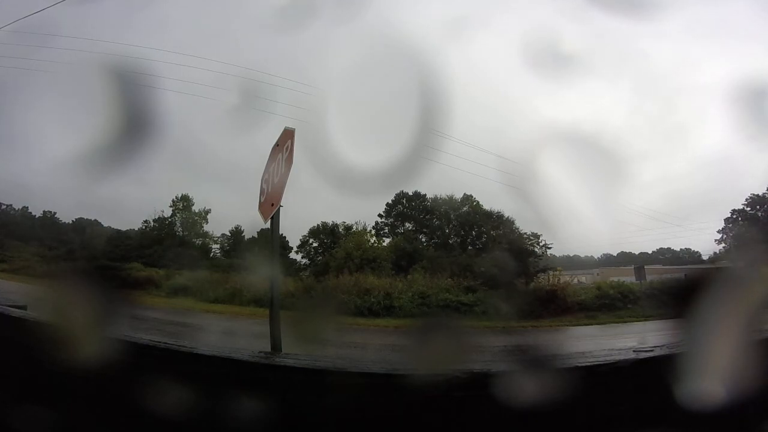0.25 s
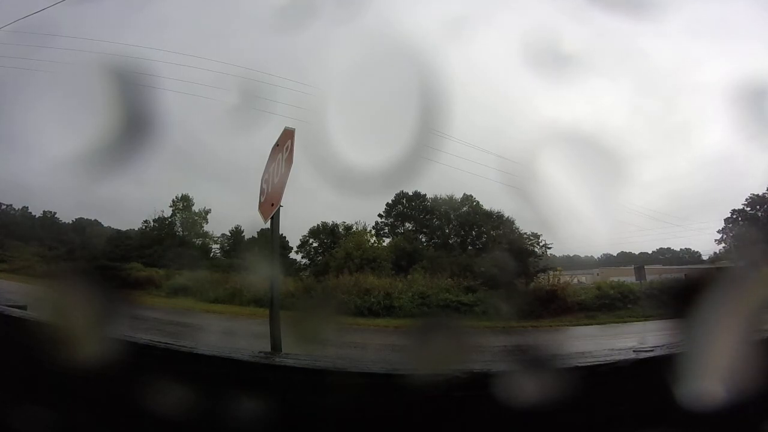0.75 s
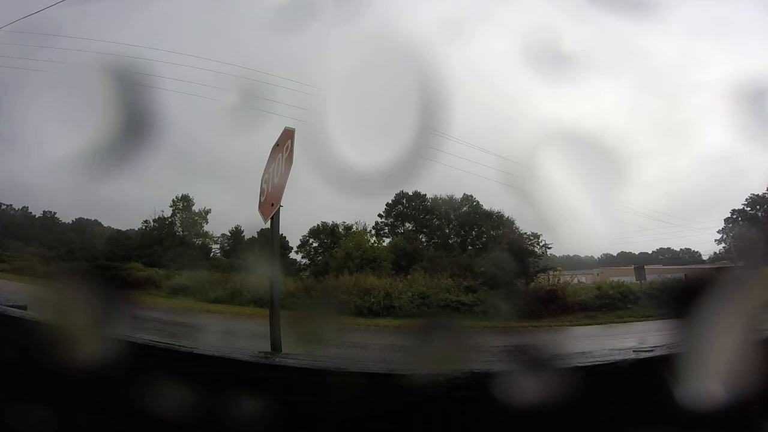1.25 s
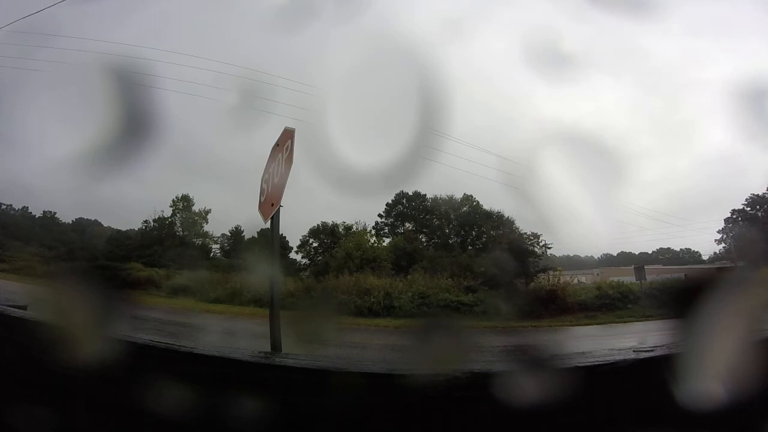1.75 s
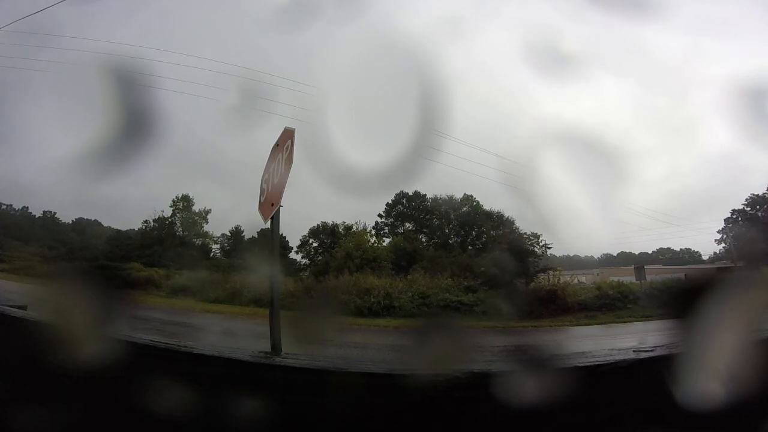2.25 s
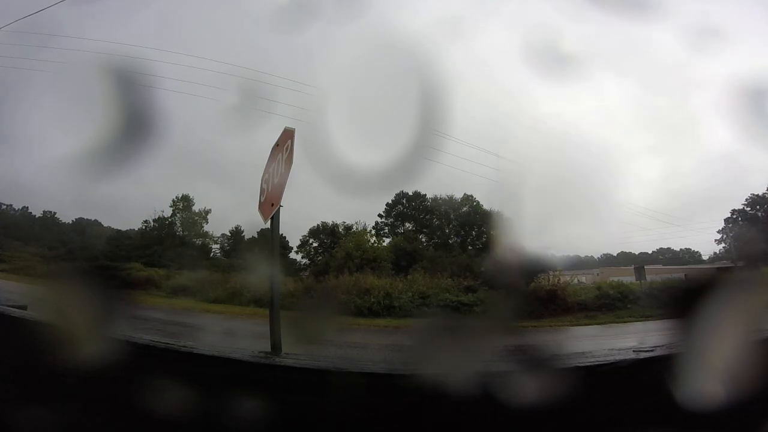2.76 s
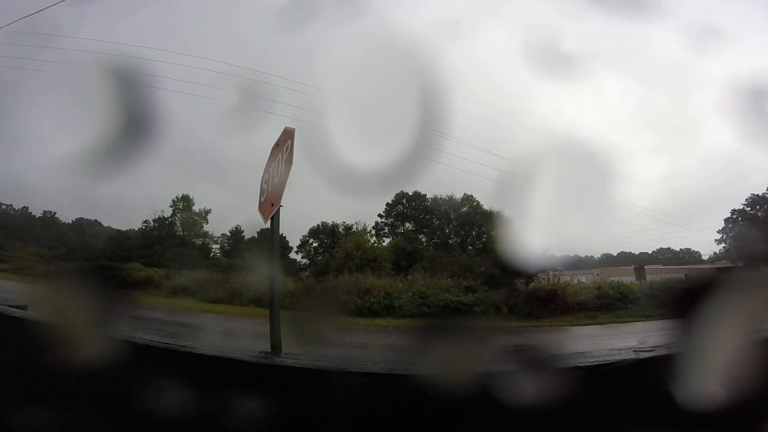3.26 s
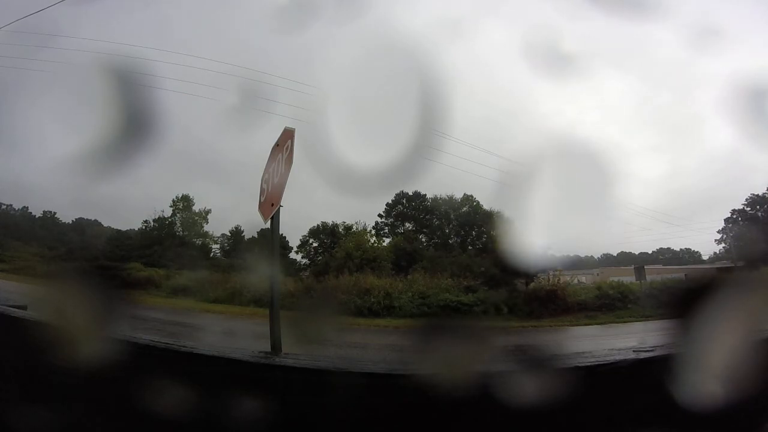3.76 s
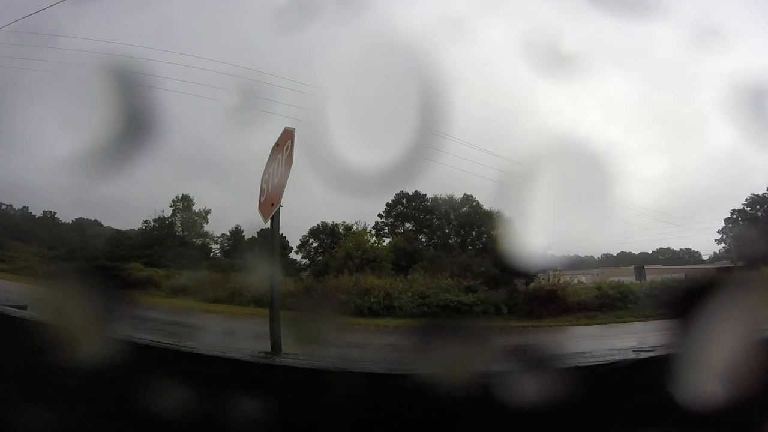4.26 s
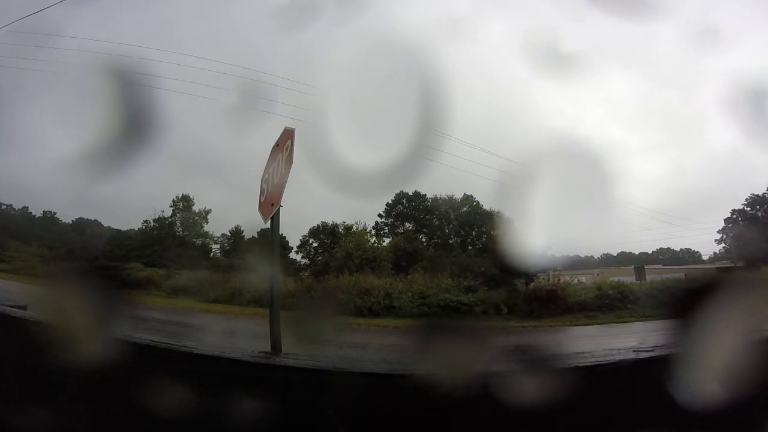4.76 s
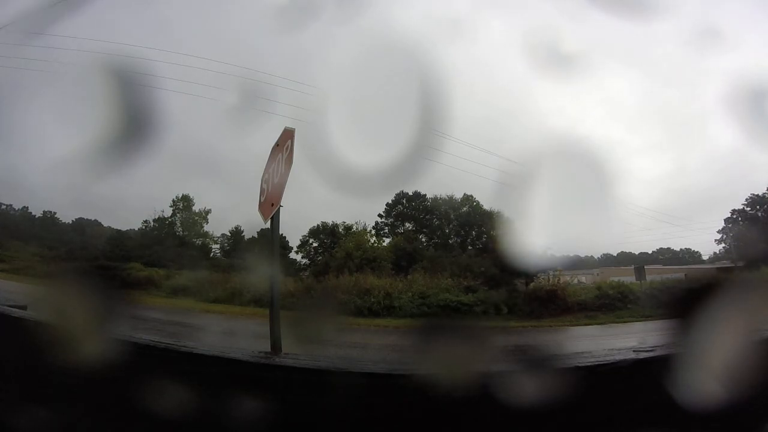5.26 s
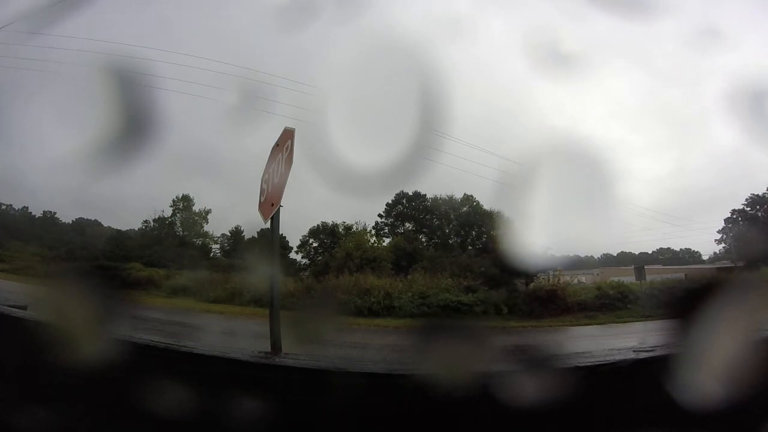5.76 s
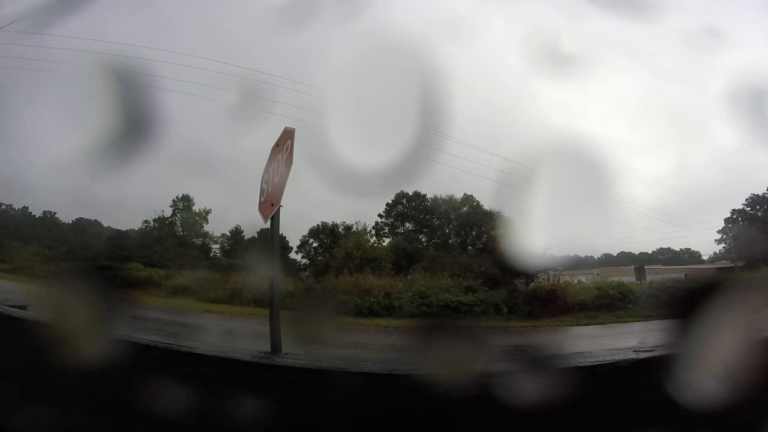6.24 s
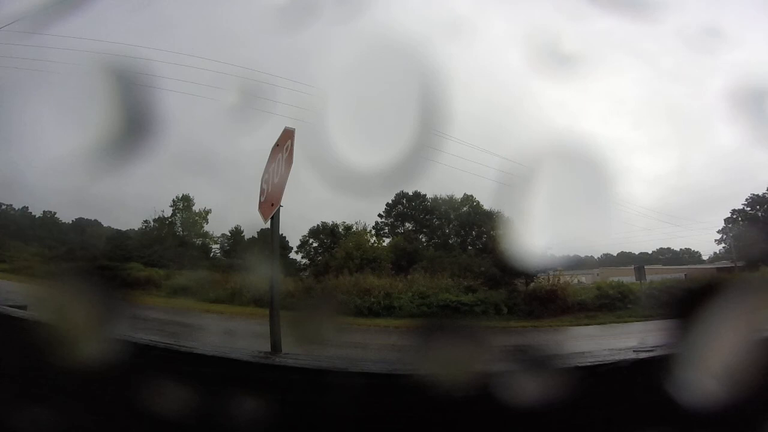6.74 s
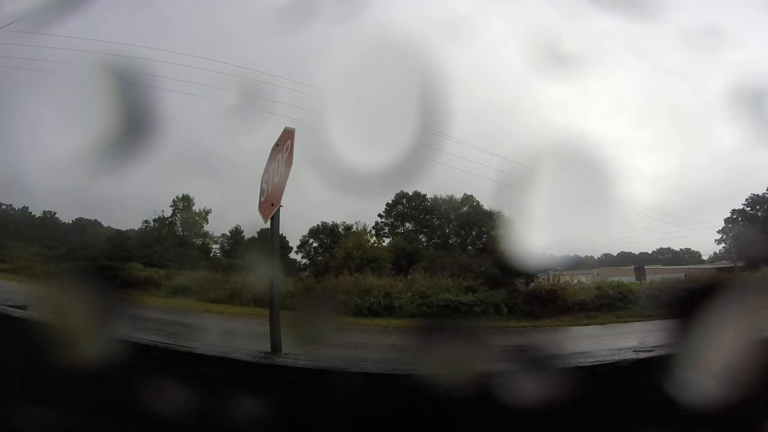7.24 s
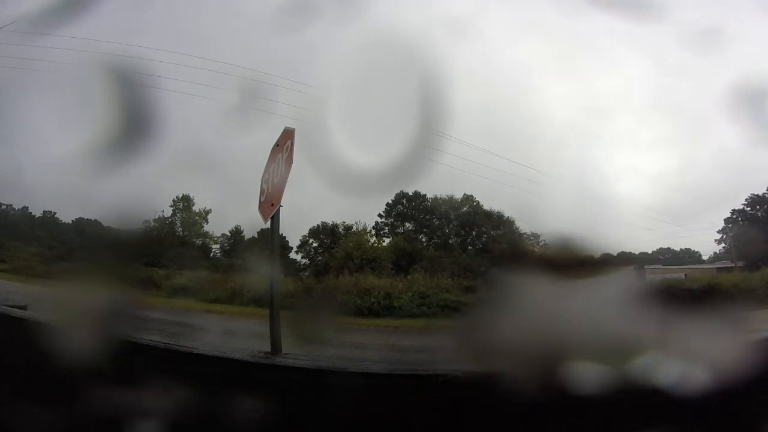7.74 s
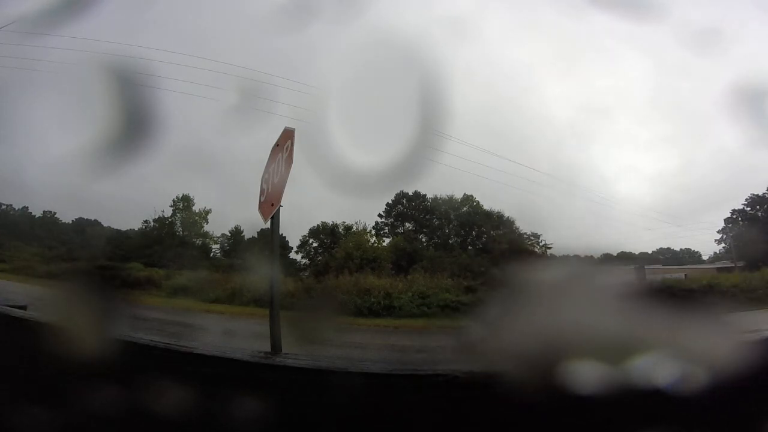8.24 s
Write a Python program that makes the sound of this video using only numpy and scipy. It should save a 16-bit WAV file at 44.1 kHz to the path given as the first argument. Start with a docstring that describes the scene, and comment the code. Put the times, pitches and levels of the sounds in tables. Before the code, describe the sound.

Very close mono sound of rain hitting a plastic shell: crisp clicks, duller knocks and tiny droplets at random intervals, each dying almost at once. A few hard drops jump well above the rest, and occasional heavy drips give soft low thuds. Distant rain over open fields stays as a quiet, slightly flickering hiss with soft low rumble underneath, dry and without reverberation.

```python
"""A faint hiss of rain on the fields and a low rumble of open air lie behind close taps of rain on plastic.
The rain falls on a small plastic camera case outdoors: each drop splats on the shell and rings its damped modes,
coloured by where it lands and how sharply it strikes. Light drops and fine droplets patter in between.
A few drops ring the mount or thud softly; the distance is noise in flickering octaves, all in one channel."""
import sys
import numpy as np
from scipy import signal
from scipy.fft import rfft, irfft
from scipy.io import wavfile
from scipy.ndimage import uniform_filter1d

SR = 44100
rng = np.random.default_rng(int(sys.argv[2]) if len(sys.argv) > 2 else 0)


def wrap_up_sound(samples):
    """Save the sound to the file named by the first command line argument, as 16-bit audio."""
    columns = np.atleast_2d(samples).T
    # keep every value between -1 and 1, then stretch to whole-number steps
    tamed = np.clip(columns, -1, 1)
    steps = np.round(tamed * 32767).astype(np.int16)
    wavfile.write(sys.argv[1], SR, steps)


N = 374832

# Edges of the four bands that set a drop's colour: f/Hz
BAND_EDGES_HZ = [900, 1800, 2900, 5200, 14000]
TAP_SIZE = 1024  # samples in one drop


def undb(db):
    """Decibels to amplitude gain."""
    return 10 ** (np.asarray(db) / 20)


def add(out, s, sound):
    """Mix a sound in at time s (seconds)."""
    i = int(np.clip(s * SR, 0, N - 1))
    out[i:i + len(sound)] += sound[:N - i]


def log_curve(hz, points_hz, db):
    """Straight lines in dB on a log-frequency axis."""
    return np.interp(np.log(np.maximum(hz, 1)), np.log(points_hz), db)


def walk(rate_hz):
    """Random levels, each held for 1 / rate_hz seconds, then smoothed twice over that time."""
    hold = int(SR / rate_hz)
    levels = np.repeat(rng.standard_normal(N // hold + 1), hold)
    return uniform_filter1d(uniform_filter1d(levels, hold), hold)[:N]


def field(level_db=-54, flicker_db=1.83):
    """Distant rain and air: shaped noise, steady overall, each octave band flickering on its own."""
    # Spectrum of rain on the fields and open air, relative: f/Hz, level/(dB per Hz)
    air_curve = [(15, -47.5), (25, 2), (64, 2), (128, 2), (231, -1), (543, -8.5), (1090, -12), (1240, -15),
                 (1420, -12), (1630, -11.5), (2020, -17), (2430, -15.5), (3730, -22.5), (9270, -30.5),
                 (15000, -44.5)]
    hz = np.fft.rfftfreq(N, 1 / SR)
    spectrum = rfft(rng.standard_normal(N)) * undb(log_curve(hz, *np.transpose(air_curve)))
    octave = np.log2(np.maximum(hz, 40)).astype(int)
    out = np.zeros(N)
    for k in np.unique(octave):
        flicker = undb(flicker_db * walk(20))
        out += irfft(spectrum * (octave == k), N) * flicker
    return out * undb(level_db) / np.std(out)


def ring(modes, weights, size):
    """Free ringing: a sum of exponentially damped cosines, each struck with its own weight."""
    hz, t60, db = np.transpose(modes)
    t = np.arange(size)[:, None] / SR
    decay = np.exp(-np.log(1000) * t / t60)
    return (decay * np.cos(2 * np.pi * hz * t)) @ (undb(db) * weights)


def causal(db):
    """Minimum-phase frequency response with these gains, which never sounds ahead of its input."""
    cepstrum = irfft(np.log(undb(db)))
    half = len(cepstrum) // 2
    # fold the part ahead of time zero onto the part after it
    cepstrum[1:half] *= 2
    cepstrum[half + 1:] = 0
    return np.exp(rfft(cepstrum))


def strike(spot_hz, spot_db=7, spot_octaves=0.16, splat_s=0.0002, splat=0.2,
           spray_s=0.0024, spray_db=-15, spray_low_hz=450):
    """A push and a brief splat ring the case, most of all the modes that are lively where the drop lands."""
    # Modes of the plastic shell: f/Hz, t60/s, level/dB
    case_modes = [(215, 0.041, -19.5), (970, 0.0076, -22), (1404, 0.0061, -20.5), (1454, 0.014, -8.5),
                  (1836, 0.016, -8), (2125, 0.016, -1.5), (2400, 0.02, -0.5), (2697, 0.012, 0),
                  (3198, 0.014, -4), (3567, 0.017, -11), (3980, 0.018, -12.5), (4740, 0.0072, -16),
                  (6290, 0.0069, -15), (7330, 0.0053, -17), (8560, 0.0027, -12.5), (10300, 0.0011, -20.5)]
    t = np.arange(TAP_SIZE) / SR
    force = splat * rng.standard_normal(TAP_SIZE) * np.exp(-t / splat_s)
    force[0] += 2
    modes = np.array(case_modes)
    modes[:, 2] += spot_db * np.exp(-(np.log2(modes[:, 0] / spot_hz) / spot_octaves) ** 2)
    # clinging water loads the shell: its modes shift a little and answer unevenly
    modes[:, 0] *= 1 + .012 * rng.standard_normal(len(modes))
    signs = (-1) ** np.arange(len(modes))
    weights = signs * (1 + .45 * rng.standard_normal(len(modes)))
    # the drop bursts into a short hiss of spray, thinned in the bass
    spray = undb(spray_db) * rng.standard_normal(TAP_SIZE) * np.exp(-t / spray_s)
    spray = signal.lfilter([1, -1], [1, -np.exp(-2 * np.pi * spray_low_hz / SR)], spray)
    ringing = signal.fftconvolve(force, ring(modes, weights, TAP_SIZE))[:TAP_SIZE]
    return ringing + spray


def tap(spot_hz, band_db, bass_db=-6, top_db=-15.5):
    """A strike brought near one drop's band levels; the shell muffles the very top."""
    hz, edges = np.fft.rfftfreq(TAP_SIZE, 1 / SR), np.array(BAND_EDGES_HZ)
    muffle_db = log_curve(hz, [400, 900, 8200, 12500], [bass_db, 0, 0, top_db])
    spectrum = rfft(strike(spot_hz)) * causal(muffle_db)
    bands = (hz >= edges[:-1, None]) & (hz < edges[1:, None])
    centres_hz = np.r_[650, np.sqrt(edges[:-1] * edges[1:])]
    for _ in range(2):
        # the tap's energy counted as power over 10 ms
        power = bands @ np.abs(spectrum) ** 2 * 2 / TAP_SIZE / (.01 * SR)
        gain_db = band_db - 10 * np.log10(power)
        # the bass gets no more gain than the bands on average
        bass_gain_db = min(gain_db.mean(), gain_db[0])
        spectrum = spectrum * causal(log_curve(hz, centres_hz, np.r_[bass_gain_db, gain_db]))
    return irfft(spectrum)


def drop_colour(spot_hz, db, sharp_db, splash_db, spot_lift_db=6, spot_width_octaves=0.45):
    """Band levels, low to high: sharp blows are bright, soft ones knock, the spot stands out; splash on top."""
    # Colour shared by drops in the low, middle and high bands: level/dB
    shared_colour = [-2.5, 0, -2.5]
    # Change of those three bands with sharpness: slope/(dB per dB)
    sharp_slope = [-0.8, 0, 0.76]
    edges = np.array(BAND_EDGES_HZ[:-1])
    octaves = np.log2(np.sqrt(edges[:-1] * edges[1:]) / spot_hz)
    spot_lift = spot_lift_db * np.exp(-(octaves / spot_width_octaves) ** 2)
    colour = shared_colour + sharp_db * np.array(sharp_slope) + spot_lift
    # the three bands together carry the tap's power
    colour = colour - 10 * np.log10(np.sum(undb(colour) ** 2))
    return db + np.r_[colour, splash_db]


def drops(gain_db=0.92, fragment_db=-22, fragment_s=0.008):
    """Distinct drops close by on the case; each breaks up and a fragment lands 4 to 8 ms later."""
    # Drops: t/s, liveliest pitch of the landing spot f/Hz, level before gain_db (power over 10 ms)/dB,
    # sharpness of the blow/dB, splash relative to the tap/dB
    taps = [(0.021, 1680, -42, 0, -15), (0.1184, 2500, -45.0, -8, -29), (0.137, 1300, -35, 0.5, -13),
            (0.1551, 1500, -42, 1, -30), (0.3092, 1470, -38.5, -4, -21), (0.5135, 2320, -30.5, 2.5, -16),
            (0.5519, 3100, -40, 8.0, -11.5), (0.705, 1940, -39.5, -1.5, -17), (0.864, 2170, -40.0, 3, -20),
            (1.0408, 2670, -28, 5.5, -16), (1.065, 2300, -36, 0, -19), (1.238, 1480, -36.5, -3.5, -33),
            (1.2712, 2480, -48, -7, -26), (1.3587, 2280, -17.5, 9.5, -17.5), (1.4589, 2500, -42, -4, -18),
            (1.4855, 2300, -23.5, 7.5, -13), (1.5571, 2590, -30, -2, -22.5),
            (1.6736, 2060, -33.5, 5.5, -13), (1.791, 2260, -43, 5.5, -24), (1.8581, 2220, -24.0, -5, -19.5),
            (1.937, 2410, -45.5, -2, -13.5), (2.0083, 1420, -40.5, -1, -26),
            (2.0287, 1400, -27.5, -11.5, -39), (2.0761, 2500, -29.5, 5.5, -18),
            (2.2174, 1450, -43, -1, -35), (2.2347, 2180, -31, 0, -26.5), (2.4025, 2300, -44, -1, -20),
            (2.4206, 2150, -31.5, 7.5, -14.5), (2.6928, 1430, -42, -2.5, -42),
            (2.8108, 1830, -38.5, -11.5, -42), (2.9651, 2390, -47.5, 10, -11),
            (3.079, 2260, -41.5, 3, -16.5), (3.3248, 3980, -40, 1.5, -12), (3.3736, 1480, -50, 2.0, -27),
            (3.5481, 1420, -43, -2.5, -14.5), (3.618, 2100, -47.5, 3, -19), (3.8559, 1410, -35.0, -4, -39),
            (3.9308, 2320, -39.0, -4.5, -13), (4.1493, 1370, -45.0, 0.5, -21),
            (4.2551, 1340, -44, -10, -36), (4.3152, 1440, -36.5, -5.0, -41),
            (4.3401, 2250, -31.5, 6, -18.5), (4.3556, 1510, -37.5, -3, -15.5),
            (4.4245, 2430, -31, -5.5, -23.5), (4.4644, 2600, -31.5, 5, -9.5),
            (4.5465, 2520, -16.5, -7.5, -25), (4.5772, 2150, -43.5, 2, -18), (4.6365, 2410, -34, 1.5, -24),
            (4.6536, 2500, -47.5, -5, -28), (4.751, 2300, -37.5, -6, -16), (4.8023, 2580, -36, 6, -18.5),
            (4.8175, 2630, -45.5, -3.5, -29), (4.8578, 1920, -41.5, 3, -7), (4.8722, 2470, -32.5, 1, -24),
            (5.045, 2170, -47.5, -1, -24), (5.164, 2310, -33, 0.5, -16.5), (5.7472, 2620, -38.5, 0.5, -24),
            (5.933, 6900, -29.5, 5, 1.5), (6.2117, 2520, -38.5, 0.5, -12), (6.3667, 1420, -48, -1.0, -12),
            (6.3854, 1490, -47.0, -14, -27), (6.4075, 2020, -39, 6, -13), (6.4734, 2240, -40.5, 5.5, -26),
            (6.693, 1920, -39, -3.5, -21), (6.7023, 2300, -20.5, -1, -17.5),
            (6.8235, 1460, -47.5, -6.0, -31), (6.9979, 2280, -39.0, 3.5, -19),
            (7.126, 2480, -38.0, -4, -21), (7.1315, 1830, -36.5, 0, -10), (7.1391, 3980, -26, -4.5, -25),
            (7.2907, 2240, -38, 1.5, -17), (7.3057, 2110, -23.0, 4.5, -23.5), (7.319, 1440, -42, -5, -31),
            (7.3566, 2130, -49.5, 2, -12), (7.3781, 3120, -31.5, 5, -18), (7.3958, 1870, -42, -3, -17),
            (7.463, 2750, -36.5, -5, -21), (7.6103, 1410, -46.5, -1.5, -25), (7.647, 1530, -39, 2, -17.5),
            (7.7836, 2370, -39, 4, -14.5), (7.914, 2160, -39.5, 1, -13.5), (7.9559, 2410, -31, 3, -19),
            (7.9901, 2350, -19, 2, -21.5), (8.0185, 2120, -25.5, 1.5, -15), (8.1253, 1440, -46, -14, -34),
            (8.185, 2390, -48, 8, -12.5), (8.2082, 1400, -46.5, -2, -31), (8.2478, 2230, -46.5, -2, -17),
            (8.3976, 1740, -38, -7.5, -15), (8.4689, 2500, -37.5, 0.5, -16)]
    out = np.zeros(N)
    for s, spot_hz, db, sharp_db, splash_db in taps:
        band_db = drop_colour(spot_hz, db, sharp_db, splash_db)
        add(out, s, tap(spot_hz, band_db + gain_db))
        fragment_delay = fragment_s * (.5 + rng.random() / 2)
        add(out, s + fragment_delay, tap(spot_hz, band_db + fragment_db))
    return out


def droplets(count=280, small_db=-66, spread_db=3, colour_db=3):
    """Fine droplets patter on the case: many tiny ones, few larger."""
    out, colour = np.zeros(N), np.array([2.5, -4.5, -11.0, -14.5])  # dB in the four bands
    for _ in range(count):
        db = min(small_db + spread_db * rng.exponential(), -59)
        band_db = db + colour + colour_db * rng.standard_normal(len(colour))
        add(out, rng.uniform(0, N / SR), tap(rng.uniform(1370, 1900), band_db))
    return out


def light_drops(count=30, mean_db=-53.0, spread_db=1.5, sharp_db=-1.5, sharp_spread_db=3, splash_db=-20):
    """Light drops land at a random moment in each equal slice of time, on one of a few spots of the case."""
    # Liveliest pitches of the landing spots: f/Hz
    light_spots = [1460, 2250, 2580]
    out = np.zeros(N)
    for k in range(count):
        size, blow = rng.standard_normal(2)
        spot_hz = rng.choice(light_spots)
        drop_db = mean_db + spread_db * size
        band_db = drop_colour(spot_hz, drop_db, sharp_db + sharp_spread_db * blow, splash_db)
        s = (k + rng.random()) / count * N / SR
        add(out, s, tap(spot_hz, band_db))
    return out


def mount(thud_t60=0.069, thud_rise_s=0.001):
    """The mount's thin ring of damped modes, and heavy drips thudding as single soft-edged damped modes."""
    # Modes of the mount: f/Hz, t60/s, level/dB
    mount_modes = [(1810, 0.24, -8.5), (2390, 0.06, -26), (2649, .2, -24), (3079, 0.09, -20)]
    # Drops that shake the mount: t/s, gain on its modes (level/dB)
    mount_hits = [(1.359, -42), (4.545, -38.5), (7.14, -27.5), (8.018, -45)]
    # Soft thuds of heavy drips: t/s, f/Hz, level before the rise and a slight trim/dB
    thuds = [(1.224, 236, -33.5), (4.763, 233, -40.5), (5.933, 136, -35.5), (8.364, 249, -39.5)]
    out, t = np.zeros(N), np.arange(SR // 2) / SR
    for s, db in mount_hits:
        add(out, s, undb(db) * ring(mount_modes, 1, len(t)))
    rise = 1 - np.exp(-t / thud_rise_s)
    for s, hz, db in thuds:
        add(out, s, undb(db) * ring([(hz, thud_t60, 0)], 0.97, len(t)) * rise)
    return out


def scene():
    """Near drops over distant rain, in one channel."""
    return (drops() + light_drops() + mount() + droplets() + field())[None]


def record(dry, top_hz=15300):
    """The camera cuts the top: a steep elliptic low-pass."""
    low_pass = signal.ellip(8, .2, 70, top_hz, fs=SR, output="sos")  # 0.2 dB ripple, 70 dB stopband
    return signal.sosfilt(low_pass, dry)


dry = scene()
out = record(dry)
wrap_up_sound(out)
```